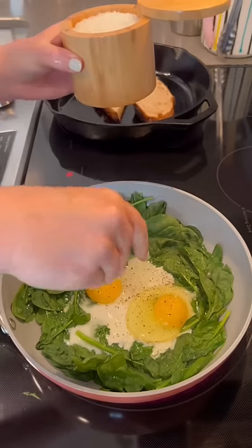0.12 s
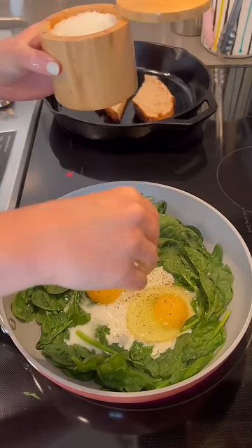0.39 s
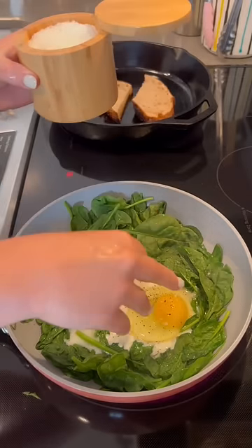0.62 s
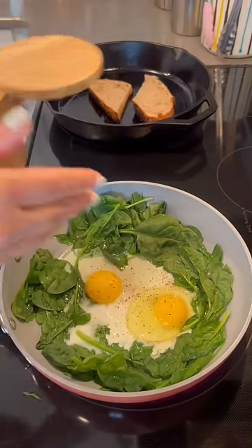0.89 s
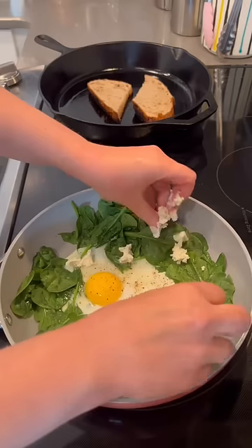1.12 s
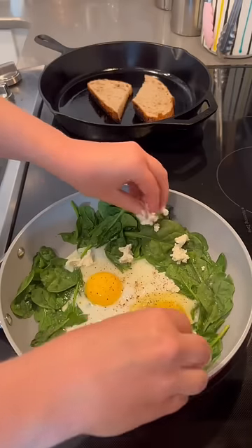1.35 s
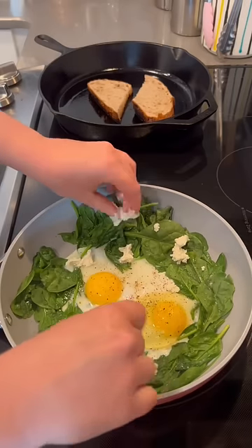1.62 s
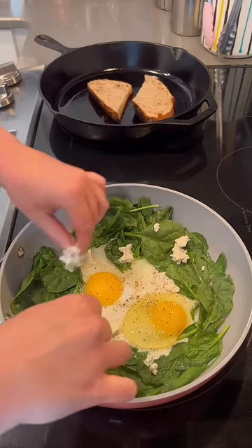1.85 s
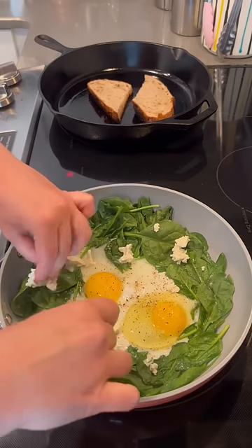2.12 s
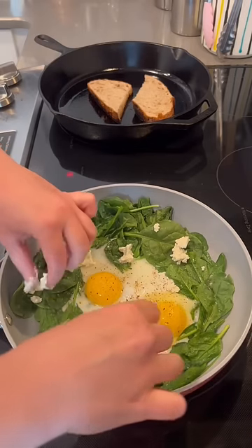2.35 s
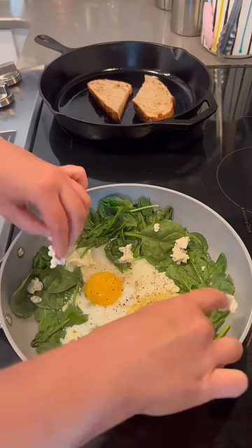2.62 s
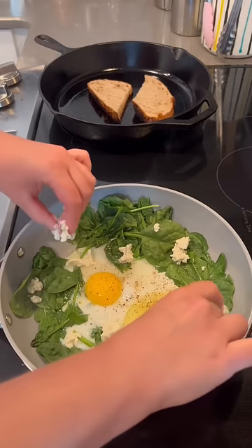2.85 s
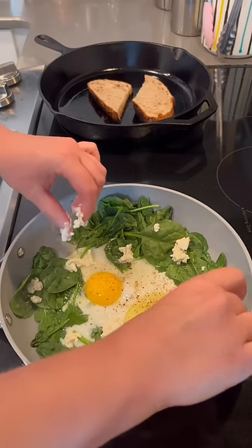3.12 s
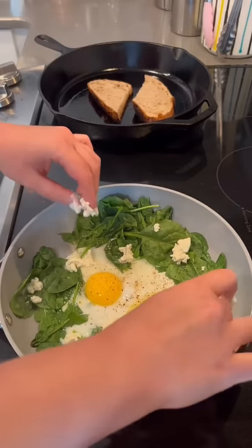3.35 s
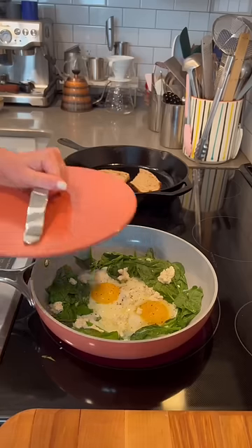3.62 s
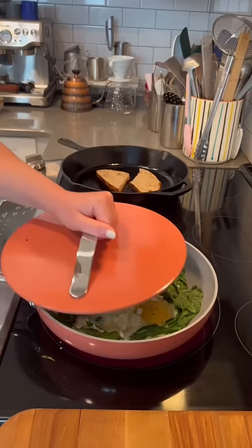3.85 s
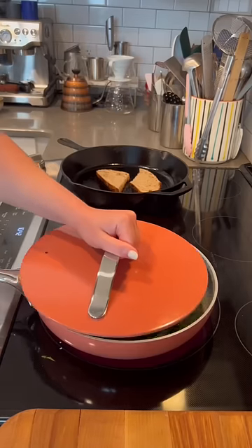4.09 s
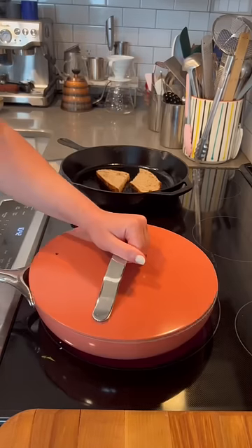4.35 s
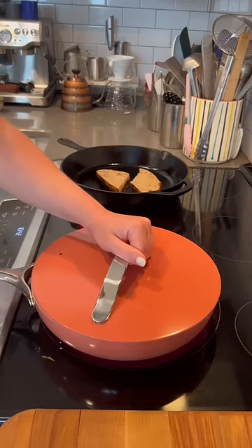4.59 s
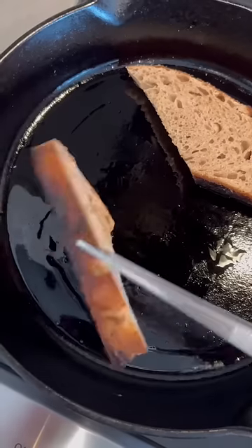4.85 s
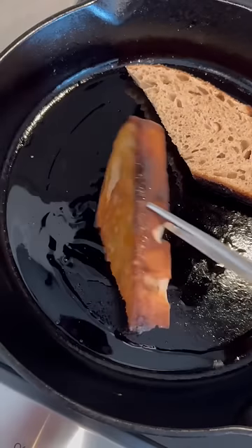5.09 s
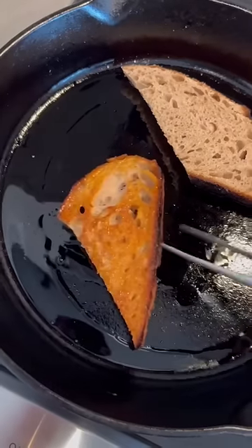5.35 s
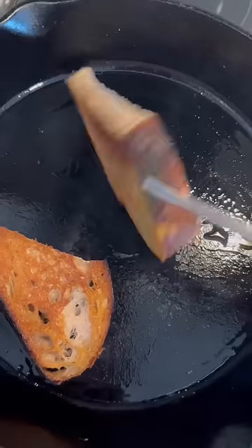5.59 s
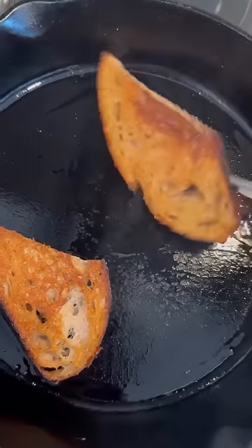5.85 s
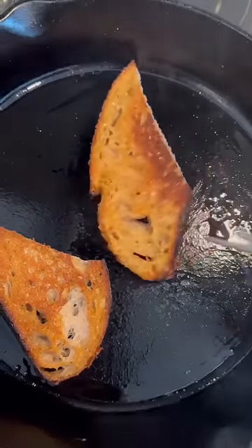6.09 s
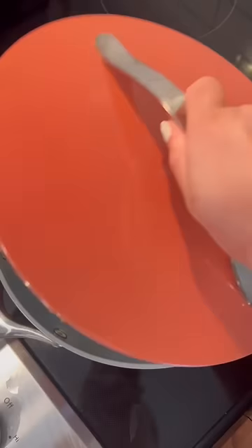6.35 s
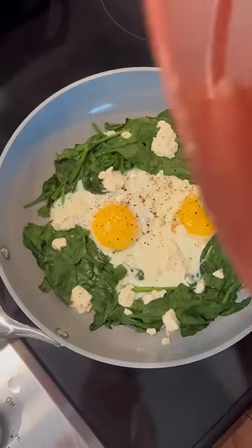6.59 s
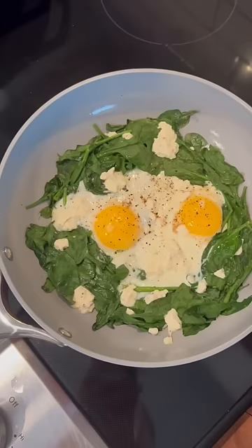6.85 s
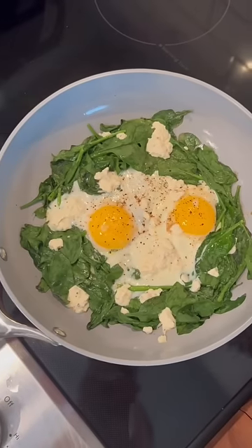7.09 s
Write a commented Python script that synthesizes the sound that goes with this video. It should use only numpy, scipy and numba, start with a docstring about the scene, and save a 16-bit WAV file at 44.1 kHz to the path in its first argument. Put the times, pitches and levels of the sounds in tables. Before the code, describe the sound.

A handheld phone close to a kitchen hob, slightly wide stereo, in six abruptly spliced shots. From 0 to 1 s, faint sizzling lies over steady low mains hum and rumble, with brief dry salt rustles in the first quarter second and a light knock near 1.03. At 1.07 the frying jumps up: wet bubbling and fine fizz with scattered pops. From 3.44 it swells, popping busily, until a metal lid strikes at 3.99, clanging, rattling and thudding against the pan until a firm final settling at 4.38-4.44; the sizzle becomes muffled. At 4.7 a quieter close shot has small tong and bread knocks near 4.94 and 5.31. At 5.58 the hum drops and bright fizz takes over, with a scrape and taps around 5.9 and piercing high pops near 6.02. At 6.35 the lid lifts with faint clinks; softer bubbling continues with occasional pops to about 7.2.

```python
"""Breakfast frying on a kitchen hob

Eggs and greens sizzle in a pan beside bread frying in a skillet, heard by a phone in six spliced shots.
Frying is steam bubbles ringing over fluttering hiss; louder pops, rustling salt and knocks stand out of it.
A metal lid clatters onto the pan as sums of decaying modes plus noise, tongs turn the bread, and the lid
is lifted again. Mains hum (wavering sines) and kitchen rumble (shaped noise) lie underneath."""
import sys
import numpy as np
from scipy import signal
from scipy.fft import rfft, irfft, next_fast_len
from scipy.io import wavfile
from scipy.ndimage import uniform_filter1d
from numba import njit

SR = 44100
rng = np.random.default_rng(int(sys.argv[2]) if len(sys.argv) > 2 else 0)


def convert_level_to_amplitude(level_db):
    """Map a level in decibels to its linear amplitude factor."""
    exponent = np.asarray(level_db, float) / 20
    return 10 ** exponent


def wrap_up_sound(samples):
    """Save the sound to the file named by the first command line argument, as 16-bit audio."""
    columns = np.atleast_2d(samples).T
    # keep every value between -1 and 1, then stretch to whole-number steps
    tamed = np.clip(columns, -1, 1)
    steps = np.round(tamed * 32767).astype(np.int16)
    wavfile.write(sys.argv[1], SR, steps)


N = 317961
T = np.arange(N) / SR


def colour(x, points):
    """Shape a spectrum by (Hz, dB) points, joined by straight lines over log frequency."""
    size = next_fast_len(len(x))
    hz, db = np.transpose(points)
    f = np.maximum(np.arange(size // 2 + 1) * SR / size, 1)
    gain_db = np.interp(np.log(f), np.log(hz), db)
    return irfft(rfft(x, size) * convert_level_to_amplitude(gain_db), size)[:len(x)]


def unit(x):
    """Scale to rms 1."""
    return x / np.sqrt(np.mean(x ** 2))


def noise(points):
    """White noise of full length, coloured by (Hz, dB) points and scaled to rms 1."""
    return unit(colour(rng.standard_normal(N), points))


def walk(rate):
    """Random levels held 1 / rate s and slewed twice."""
    k = int(SR / rate)
    steps = np.repeat(rng.standard_normal(N // k + 1), k)
    return 2.13 * uniform_filter1d(uniform_filter1d(steps, k), k)[:N]


def swell(centre_s, spread_s, level_db):
    """A bell-shaped rise and fall of level."""
    return convert_level_to_amplitude(level_db) * np.exp(-.5 * ((T - centre_s) / spread_s) ** 2)


@njit
def rings(start, hz, t60, size, count):
    """Each grain is a sine that starts at once and dies away."""
    y = np.zeros(count)
    for k in range(len(start)):
        turn = np.exp((2j * np.pi * hz[k] - np.log(1000) / t60[k]) / SR)
        z = size[k] + 0j
        for i in range(start[k], min(count, start[k] + int(t60[k] * SR))):
            y[i] += z.imag
            z *= turn
    return y


def play(rows):
    """Rows of (start_s, peak_db, pitch_hz, t60_s) as ringing grains."""
    s, db, hz, t60 = np.array(rows, float).T.copy()
    return rings((s * SR).astype(np.int64), hz, t60, convert_level_to_amplitude(db), N)


# mains lines, level against the whole hum: pitch_hz, level_db
HUM = [(59.6, -13.5), (119.5, 1.5), (239.5, -17), (479, -28)]


def hum():
    """Mains lines whose level and phase waver a little."""
    lines = 0
    for hz, db in HUM:
        level = np.sqrt(2) * convert_level_to_amplitude(db + 0.74 * walk(8))
        lines = lines + level * np.sin(2 * np.pi * hz * T + 0.33 * walk(1.2))
    return lines


# low rumble of the kitchen, slope of its spectrum: pitch_hz, level_db (per Hz)
RUMBLE = [(35, -30), (55, 3), (90, -3.5), (150, -0.5), (220, -13), (320, -59.5)]
# air of the room, slope of its spectrum: pitch_hz, level_db
AIR = [(120, -20.5), (220, 1.5), (400, 0), (620, 2), (950, -6.5), (1600, -4), (4000, -42.5), (12000, -62)]


def room_tone(hum_db, rumble_db, air_db):
    """Hum, rumble of drifting level and steady air, each at its level in the shot."""
    rumble = convert_level_to_amplitude(rumble_db + 1.3 * walk(2.5)) * noise(RUMBLE)
    return convert_level_to_amplitude(hum_db) * hum() + rumble + convert_level_to_amplitude(air_db) * noise(AIR)


def sizzle(shape, low_hz, high_hz, per_s, cycles, spread_db, grain_db):
    """Steam bubbles of many sizes burst over a fine hiss that flutters."""
    when, size, rarity = rng.random((int(per_s * N / SR), 3)).T
    hz = low_hz * (high_hz / low_hz) ** size
    peak_db = -spread_db * np.log(rarity + .03)  # the offset limits the rarest, loudest bursts
    grains = play(np.c_[when * N / SR, peak_db, hz, cycles / hz])
    hiss = rng.standard_normal(N) * convert_level_to_amplitude(0.91 * walk(14))
    return unit(colour(hiss + convert_level_to_amplitude(grain_db) * unit(grains), shape))


# wet bubbling, colour of the sizzle: pitch_hz, level_db
BUBBLING = [(400, -5.5), (900, -11.5), (1400, -5), (2300, -1), (3300, -3), (5000, -6.5), (8000, -25)]
# fine fizz of the fat, colour of the sizzle: pitch_hz, level_db
FIZZ = [(2500, -26), (4500, -9.5), (6500, -1.5), (8400, -1), (11000, -6.5), (13000, -16.5), (16000, -17.5)]
# frying as each shot starts and ends: bubbling_start_db, bubbling_end_db, fizz_start_db, fizz_end_db
FRYING = [(-62, -59.5, -68.5, -65.5), (-51.5, -49.5, -53.5, -54.5), (-55, -47, -57.5, -49.5),
          (-69.5, -67, -69, -63.5), (-53.5, -53.5, -53, -50), (-60, -58, -64.5, -58.5)]
# frying heard from just above: pitch_hz, level_db
CLOSE = [(1500, -0.5), (2700, 2), (4500, 0.5), (9000, 2.5), (14000, 11)]


def frying(shot, along):
    """Bubbling and fizz glide through each shot, and sink as the lid closes over the pan."""
    shut_s, closing_s, muffle_db = 4.4, 0.58, -14.5
    closed = np.clip(1 + (T - shut_s) / closing_s, 0, 1) * (shot == 2)
    levels = np.transpose(FRYING)[:, shot]
    start_db, end_db = levels[0::2], levels[1::2]
    bubble_db, fizz_db = start_db + (end_db - start_db) * along + muffle_db * closed
    bubbling = sizzle(BUBBLING, low_hz=850, high_hz=4950, per_s=260, cycles=6.5, spread_db=4.5, grain_db=-6.5)
    fizz = sizzle(FIZZ, low_hz=3660, high_hz=14500, per_s=490, cycles=16.0, spread_db=2.0, grain_db=-4.5)
    fat = convert_level_to_amplitude(bubble_db) * bubbling + convert_level_to_amplitude(fizz_db) * fizz
    return np.where(shot < 3, fat, colour(fat, CLOSE))


# fingers rub salt: centre_s, level_db, spread_s
SALT = [(0.029, -54, 0.025), (.15, -51.5, 0.019), (.22, -61, 0.025)]


def salt():
    """Dry grains rustle high up: flickering bright noise in short swells."""
    rub = sum(swell(s, spread, db) for s, db, spread in SALT)
    grains = rng.standard_normal(N) * convert_level_to_amplitude(0.98 * walk(430))
    return rub * unit(colour(grains, [(4000, -15.0), (6500, -7.5), (8500, -3.5), (13000, -12.5)]))


# loudest bursts of steam in the fat: start_s, peak_db, pitch_hz
POPS = [(0.4745, -40.5, 775), (0.7743, -40, 1210), (0.8418, -36, 2010), (1.2118, -28.5, 5270),
        (1.3213, -31.5, 3550), (1.389, -31, 4500), (1.425, -31.5, 2540), (1.484, -26.5, 2580),
        (1.6728, -29, 2080), (2.37, -23.5, 4300), (2.8942, -31.5, 2170), (2.988, -31.5, 1760),
        (3.001, -26, 2600), (3.087, -27, 3160), (3.221, -23, 2280), (3.348, -33, 2400), (3.3749, -30, 1800),
        (3.5492, -35, 3350), (3.572, -29, 3340), (3.618, -28.5, 1920), (3.6288, -28, 2380),
        (3.693, -23, 6700), (3.7317, -29, 2550), (5.6614, -26.5, 6500), (5.696, -28, 5960),
        (5.722, -28.5, 7170), (5.8706, -28, 7000), (5.971, -26.5, 5590), (6.021, -17, 8500),
        (6.0219, -10.5, 7650), (6.045, -21, 9000), (6.094, -23.5, 8700), (6.1675, -23.5, 9600),
        (6.2052, -21.5, 8300), (6.2294, -21, 8350), (6.2625, -26, 8650), (6.5292, -35, 2400),
        (6.546, -32.5, 2290), (6.7795, -32, 2440), (6.9167, -24.5, 8500), (6.943, -28.5, 5670),
        (7.011, -25.5, 2570), (7.1974, -29.5, 2320)]


def pops():
    """A short ring at the bubble's pitch, a snap of broken film and a wet tail."""
    s, db, hz = np.transpose(POPS)
    # snap against ring is -11 dB at 2.5 kHz; small bubbles snap harder
    snap_db = db - 11 + 4 * np.log2(hz / 2500)
    snap_db = snap_db + 2 * (s > SHOTS[4][0])  # more of the snap is heard from just above
    snaps, t = np.zeros(N), np.arange(600) / SR
    for at, pitch_hz, level_db in zip(s, hz, snap_db):
        snap = rng.standard_normal(600) * (np.exp(-t / 0.00136) + 0.21 * np.exp(-t / 0.0077))
        i = int(at * SR)
        snaps[i:i + 600] += convert_level_to_amplitude(level_db) * colour(snap, [(pitch_hz / 4, -8), (pitch_hz, 0)])[:N - i]
    ring = play(np.c_[s, db, hz, 11.0 / hz])
    return ring + colour(snaps, [(700, -18.0), (2500, -5.5), (8500, -3.0), (15000, -9.0)])


def kitchen(x, t60, wet_db):
    """Hard walls return a short tail of decaying noise, coloured by the room."""
    t = np.arange(int(t60 * SR)) / SR
    tail = colour(rng.standard_normal(len(t)), [(100, -1.0), (2000, 2.0), (12000, -3.0)])
    tail = tail * 1000. ** (-t / t60) * (t > .004)  # the first reflection comes after 4 ms
    return x + convert_level_to_amplitude(wet_db) * signal.fftconvolve(x, tail / np.linalg.norm(tail))[:N]


# salt box, bread and tongs knock: start_s, peak_db, pitch_hz, t60_s
TAPS = [(1.027, -40, 850, 0.035), (1.026, -50.5, 4830, 0.017), (4.943, -31.5, 2580, 0.0052),
        (5.005, -50, 1500, 0.017), (5.008, -50, 2550, 0.02), (5.308, -39.5, 2400, 0.0075),
        (5.314, -34.5, 536, 0.036), (5.63, -39, 385, 0.018), (5.89, -36, 565, 0.015),
        (5.898, -37.5, 166, 0.083), (5.908, -26, 1470, 0.01), (5.921, -31.5, 1500, 0.014)]


def taps():
    """Dull or bright ringing knocks, each with a little noisy crunch of crust."""
    t = np.arange(1500) / SR
    crunch = np.zeros(N)
    for s, db, hz, t60 in TAPS:
        i = int(s * SR)
        crunch[i:i + 1500] += convert_level_to_amplitude(db) * hz / 2450 * rng.standard_normal(1500) * np.exp(-t / 0.0037)
    return play(TAPS) + colour(crunch, [(500, -19.0), (2500, -3.0), (8500, 0.5), (12000, -18)])


# lid on pan: start_s, ring_db, clack_db (against ring), free (scales the ring time), favoured_hz
BLOWS = [(3.9868, -8, -6.5, 1, 639.3), (4.054, -23, -9, 0.55, 3754), (4.138, -25.5, -7, 0.38, 2378),
         (4.184, -21, -1.5, 0.3, 2760), (4.197, -21, -13, 0.4, 670), (4.241, -26.5, 0, 0.41, 3320),
         (4.381, -9, -15, 0.21, 628), (4.426, -22, -7.5, 0.17, 1090), (4.442, -23, -19, 0.05, 1090),
         (6.352, -43.5, -10, 0.45, 600), (6.372, -50.5, -18, 0.46, 1403), (6.41, -47.5, -17, 0.6, 610),
         (6.445, -52, -22, 1.45, 651)]
# modes of the lid: pitch_hz, level_db, t60_s (at free = 1)
LID = [(619, -5.5, .17), (651, 1, 0.32), (714, -14.5, 0.15), (1090, -8.5, 0.086), (1370, -19.5, .2),
       (1403, -13, 0.36), (1470, -6, 0.29), (1646, -17, .17), (2070, -17, .12), (2378, -13, .45),
       (2595, -8.5, .33), (2760, -14, 0.15), (3320, -17.5, .24), (3555, -13.5, .3), (3754, -9.5, .25),
       (4244, -10, 0.13), (5006, -12.5, 0.16), (5130, -19, 0.16), (5647, -20, .25), (6535, -19, 0.27),
       (8300, -17, .2)]


def lid():
    """Each contact rings the lid's modes and clacks at the rim."""
    pressed_t60_s, pressed_db = 0.033, -12  # ring of the lid while the rim is in contact
    touch_damp_db = -5  # each new contact takes this from what still rings
    out, t = np.zeros(N + SR), np.arange(SR // 2) / SR
    hz, mode_db, t60 = np.transpose(LID)[:, :, None]
    sign = (-1.) ** np.arange(len(LID))[:, None]  # neighbouring modes start in opposite directions
    waves = sign * np.sin(2 * np.pi * hz * t)
    pressed = (convert_level_to_amplitude(mode_db / 2) * waves * 1000. ** (-t / pressed_t60_s)).sum(0)
    pressed = pressed / np.linalg.norm(pressed)
    for s, ring_db, clack_db, free, favoured_hz in BLOWS:
        chance_db = rng.standard_normal(hz.shape)
        # the place of contact favours some modes; a lid held against the pan rings shorter
        octaves = np.abs(np.log2(hz / favoured_hz))
        spot_db = mode_db - 2.3 * octaves + 10.0 * np.exp(-(octaves / 0.03) ** 2) + chance_db
        fade = 1000. ** (-t / (t60 * np.clip(free, .05, 1.5)))
        touches = np.searchsorted(np.transpose(BLOWS)[0], s + t, side="right")
        touched = convert_level_to_amplitude(touch_damp_db * uniform_filter1d(1. * (touches - touches[0]), size=200))
        ring = (convert_level_to_amplitude(spot_db - spot_db.max()) * waves * fade).sum(0) * touched
        clack = colour(rng.standard_normal(len(t)), [(150, -14.0), (500, 5.5), (2000, -2.5), (5000, -3.0),
                                                    (7000, -12), (11000, -24.5), (13000, -55.5)])
        decay = 2.57 * np.exp(-t / 0.002) + 1.0 * np.exp(-t / 0.0094) + .06 * np.exp(-t / 0.049)
        clack = unit(clack) * decay
        # the clack shakes every mode for a moment, so the noise has the lid's colour
        clack = clack + convert_level_to_amplitude(pressed_db) * signal.fftconvolve(clack, pressed)[:len(t)]
        blow = convert_level_to_amplitude(ring_db) * ring + convert_level_to_amplitude(ring_db + clack_db) * clack
        i = int(s * SR)
        out[i:i + len(t)] += blow * (1 - np.exp(-t / 0.00057))
    return out[:N]


# the pan jolts on the glass hob: start_s, level_db, favoured_hz
JOLTS = [(3.989, -17.5, 141), (4.049, -26, 141.7), (4.143, -25.5, 139.4), (4.191, -16, 140),
         (4.223, -24, 140), (4.246, -21, 199.5), (4.268, -24.5, 422), (4.383, -12.5, 326),
         (4.4, -19.5, 136.6), (4.428, -23.5, 418), (4.442, -14.5, 188.5), (6.356, -41, 326),
         (6.385, -41, 160), (6.425, -43, 140)]
# modes of the pan, rocking base below and singing wall above: pitch_hz, level_db, t60_s
PAN = [(140, 0, .24), (241, -1.5, .11), (326, -3, .1), (420, -5, .09), (560, -5, .09), (1400, -12, .42),
       (2392, -13, .4)]


def pan():
    """Each jolt swells into the pan's modes, most of all those near its pitch, with a rough rattle."""
    rattle_db, rattle_s = -7, .018  # lid and pan chatter after a jolt
    out, t = np.zeros(N + SR), np.arange(SR // 2) / SR
    hz, mode_db, t60 = np.transpose(PAN)[:, :, None]
    for s, db, favoured_hz in JOLTS:
        spot_db = mode_db - 4.5 * np.abs(np.log2(hz / favoured_hz))
        thud = (convert_level_to_amplitude(db + spot_db) * np.sin(2 * np.pi * hz * t) * 1000. ** (-t / t60)).sum(0)
        rattle = colour(rng.standard_normal(len(t)), [(80, -8), (300, 0), (1100, -8), (3000, -20), (8000, -40)])
        thud = thud + convert_level_to_amplitude(db + rattle_db) * unit(rattle) * np.exp(-t / rattle_s)
        i = int(s * SR)
        out[i:i + len(t)] += thud * (1 - np.exp(-(t / 0.003) ** 2))
    return out[:N]


# crust, tongs and lid rim drag over metal: centre_s, spread_s, level_db, pitch_hz, fall_db (per octave)
SCRAPES = [(4.812, 0.02, -61, 2850, -22), (5.29, .018, -58.5, 1600, -5.5), (5.856, 0.014, -46, 2200, -5.5),
           (6.41, .045, -70, 2460, -12)]


def scrape():
    """Short gritty drags: rapidly flickering noise, each around its own pitch."""
    out = 0
    for s, spread, db, hz, fall_db in SCRAPES:
        grit = rng.standard_normal(N) * convert_level_to_amplitude(2.2 * walk(300))
        grit = colour(grit, [(hz / 8, 3 * fall_db), (hz, 0), (hz * 2, 2 * fall_db), (hz * 8, 6 * fall_db)])
        out = out + swell(s, spread, db) * unit(grit)
    return out


def handling():
    """The hand-held phone moves: a low, lumpy rumble that swells and passes."""
    lumps = colour(rng.standard_normal(N), [(25, -11), (45, -1.5), (75, 3.5), (110, -19.5), (200, -56)])
    lumps = lumps * convert_level_to_amplitude(2.6 * walk(25))
    return swell(6.08, .16, -56.5) * unit(lumps)


@njit
def notch(x, hz, sharp, depth):
    """Take a moving band out of the sound with a state-variable filter."""
    y, band, low = np.empty(len(x)), 0., 0.
    for i in range(len(x)):
        g = np.tan(np.pi * hz[i] / SR)
        v = (band + g * (x[i] - low)) / (1 + g * (g + 1 / sharp))
        band, low = 2 * v - band, low + 2 * g * v
        y[i] = x[i] - depth[i] * v / sharp
    return y


# a narrow dip wanders through the sound close over the skillet: time_s, pitch_hz
DIP = [(5.72, 1173), (5.78, 826), (5.86, 1200), (5.99, 587), (6.12, 396), (6.3, 198)]


def wandering_dip(x, shot):
    """Two notches in a row follow the dip in the fifth shot and grow shallower."""
    hz = np.interp(T, *np.transpose(DIP))
    depth = np.interp(T, (5.5, 6.3), [1, .4]) * (shot == 4)
    for _ in range(2):
        x = notch(x, hz, 4.0, depth)
    return x


def ports(x, side, diffuse):
    """Side signal of two close microphone ports: a quarter-turn copy plus one scattered by the room."""
    smear = rng.standard_normal(4000) * np.exp(-np.arange(4000) / 1100.0)
    share = np.clip(diffuse, 0, 1)
    turned = np.imag(signal.hilbert(x, next_fast_len(N)))[:N]
    smeared = signal.fftconvolve(x, smear / np.linalg.norm(smear))[:N]
    return colour(np.sqrt(share) * smeared - np.sqrt(1 - share) * turned, side)


# side against mid, phone back from the hob: pitch_hz, level_db
SIDE_FAR = [(60, -16), (110, -32), (200, -16), (380, -5), (700, -1), (1290, -12), (2380, -12), (4400, -5.5),
            (15000, -0.5)]
# side against mid, phone close over the hob: pitch_hz, level_db
SIDE_NEAR = [(60, -8), (110, -27), (200, -10.5), (380, -6), (700, 3), (1290, -8.5), (2380, -4.5), (4400, 0),
             (15000, -3)]


def stereo_side(rest, clatter, shot):
    """The phone's side signal, far in the first three shots and near in the others."""
    # the lid sits straight ahead, so it reaches both ports more alike
    wide = rest + colour(clatter, [(300, -9), (700, -10), (1500, 0)])
    far = ports(wide, SIDE_FAR, diffuse=0.78)
    near = ports(wide, SIDE_NEAR, diffuse=0.38)
    return np.where(shot < 3, far, near)


# what each shot starts with: start_s, hum_db, rumble_db, air_db
SHOTS = [(0, -49, -54.5, -60), (1.074, -47.5, -54, -59), (3.44, -49.5, -55.5, -60.5),
         (4.705, -51.5, -58, -68.5), (5.583, -70.5, -64, -74), (6.345, -82.5, -57.5, -59)]


def scene():
    """All sources, shot by shot, as left and right; every splice fades in over 22 ms."""
    cuts, *room_db = np.transpose(SHOTS)
    shot = np.searchsorted(cuts, T, side="right") - 1
    since_cut_s = T - cuts[shot]
    along = since_cut_s / np.diff([*cuts, N / SR])[shot]
    room = room_tone(*(level_db[shot] for level_db in room_db))
    food = frying(shot, along) + salt()
    small = kitchen(pops() + taps(), t60=0.12, wet_db=-9.0)
    clatter = kitchen(lid() + pan(), t60=0.35, wet_db=-11.0)
    rest = wandering_dip(room + food + small + scrape() + handling(), shot)
    side = stereo_side(rest, clatter, shot)
    fade = np.where(shot > 0, np.minimum(since_cut_s / .022, 1), 1)
    return fade * (rest + clatter + np.array([side, -side]))


def band_limit(x):
    """A steep low-pass at the top of the band."""
    return signal.sosfilt(signal.butter(12, 16670, fs=SR, output="sos"), x)


def record(dry):
    """The phone rounds the loudest peaks and cuts the top above 15.8 kHz."""
    rounded = np.tanh(dry)
    low_pass = signal.ellip(8, .2, 60, 15800, fs=SR, output="sos")
    mix = signal.sosfilt(low_pass, rounded)
    return band_limit(mix)


dry = scene()
out = record(dry)
wrap_up_sound(out)
```